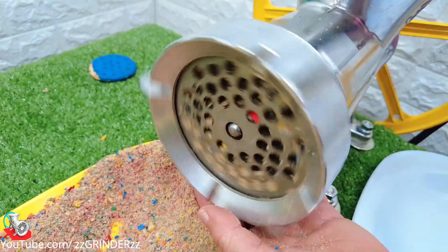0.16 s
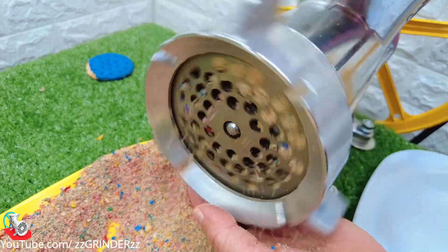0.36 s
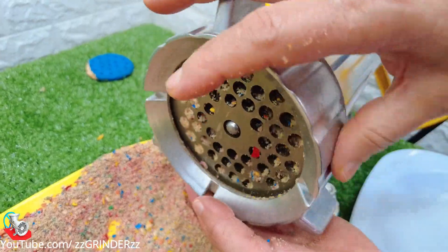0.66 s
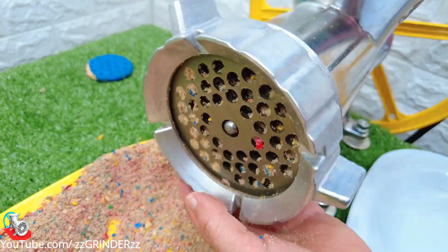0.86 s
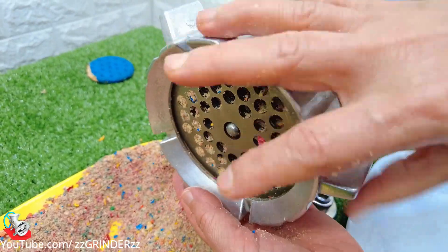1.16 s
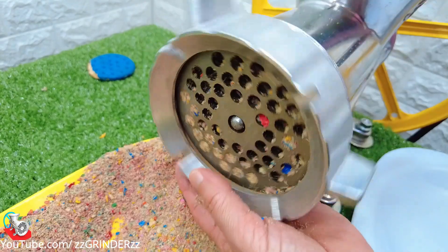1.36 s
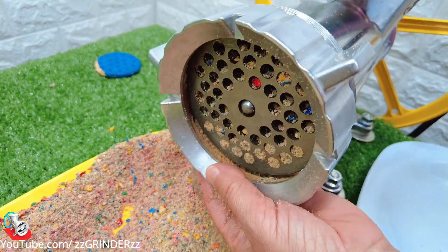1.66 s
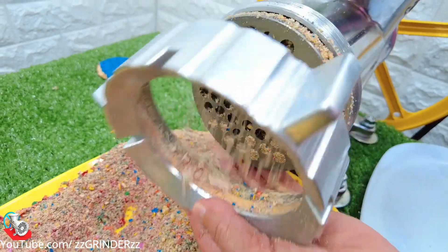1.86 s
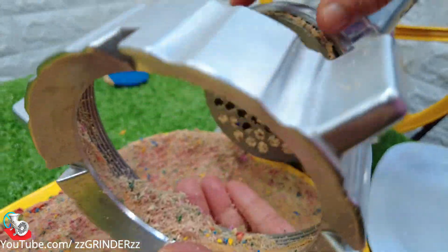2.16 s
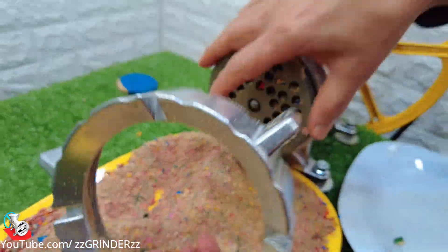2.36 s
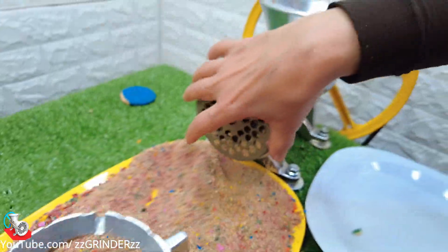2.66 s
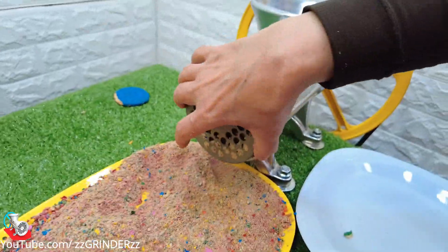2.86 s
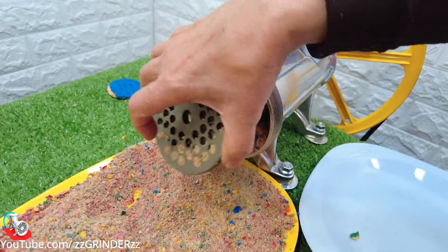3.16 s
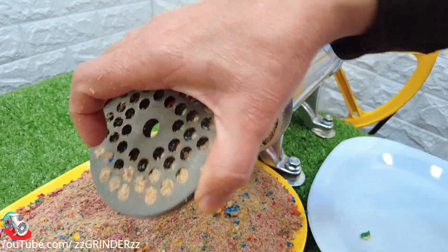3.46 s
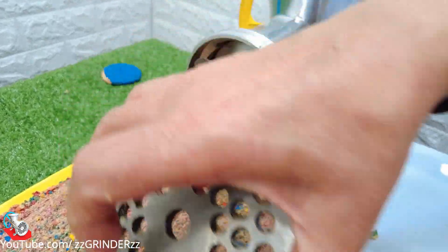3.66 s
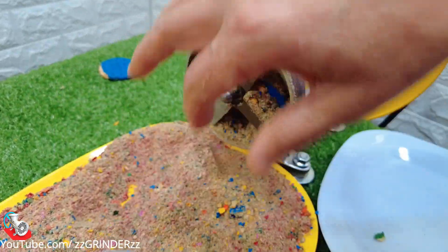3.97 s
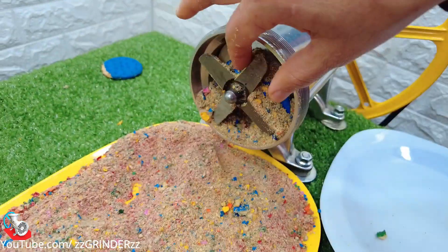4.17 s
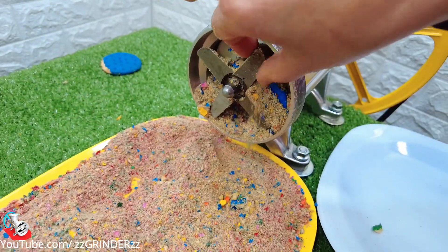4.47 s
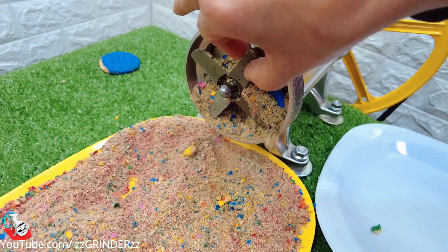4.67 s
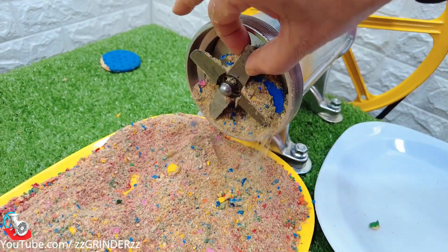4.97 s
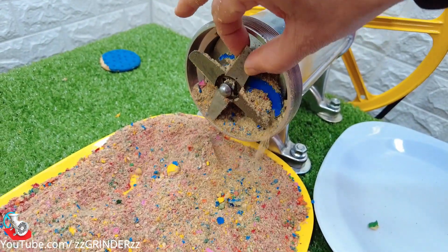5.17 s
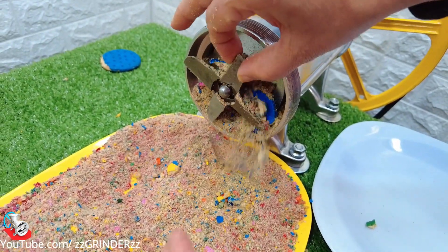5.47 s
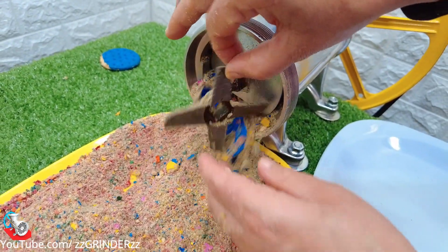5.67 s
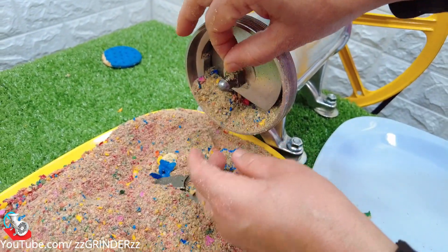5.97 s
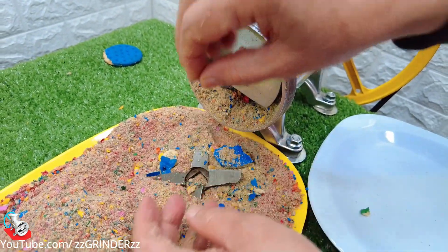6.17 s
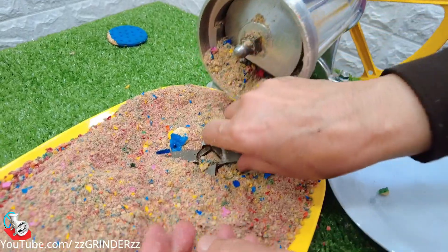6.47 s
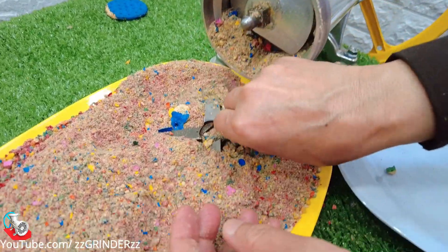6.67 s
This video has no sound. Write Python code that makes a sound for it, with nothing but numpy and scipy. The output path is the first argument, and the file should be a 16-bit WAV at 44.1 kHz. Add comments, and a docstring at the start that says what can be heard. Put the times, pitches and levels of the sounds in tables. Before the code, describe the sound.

Close gritty metal scraping with knocks, a short bright clank, a ringing clink, crunching jerks and two sharp snaps, fading to quiet crumb rustle.

```python
"""Gritty scraping, knocks and bright clinks, with faint high tones: a metal meat grinder full of cookie
crumbs is taken apart by hand, close by, in a small room. The ring nut spins off, the hole plate is pulled from
its pin, the cross knife snaps free. Blows and stick-slip jerks ring the modes of each part; filtered noise
makes grit, trickling crumbs and air; the table sways, drones and rocks at low frequency."""
import sys
import numpy as np
from scipy import signal
from scipy.fft import rfft, irfft, next_fast_len
from scipy.io import wavfile
from scipy.ndimage import uniform_filter1d

SR = 44100
rng = np.random.default_rng(int(sys.argv[2]) if len(sys.argv) > 2 else 0)


def dump_mix(stems):
    """Bounce the given channels to the path in sys.argv[1] as a 16-bit WAV at rate SR."""
    frames = np.atleast_2d(stems).T  # one column per channel
    limited = np.clip(frames, -1, 1)  # hard clip at full scale
    pcm = np.round(limited * 32767).astype(np.int16)
    wavfile.write(sys.argv[1], SR, pcm)


N = 301203
TIME = np.arange(N) / SR
RING_TIME = TIME[:SR // 2]


def ring_nut():
    """The loose nut scrapes round on crumbs and knocks as it wobbles on the thread."""
    # blows: t/s, ring/dB, treble re ring/dB, thud/dB, chatter/s, click/dB, click f/Hz
    nut_knocks = [(.087, -50.5, -16.5, -48.5, 0.005, -45, 900),
                  (.123, -52, -7.5, -42.5, 0.017, -36.5, 1200), (.149, -49.5, 0, -42, 0.006, -33.5, 804),
                  (.174, -33.5, -13, -33.5, 0.0065, -22, 722.7),
                  (.190, -40.5, 1, -45.5, 0.0089, -34.5, 4483), (.441, -54.5, -14, -50, 0.004, -35.5, 2000),
                  (.479, -56, -16.5, -43.5, 0.004, -46, 900), (.492, -35.5, -28.5, -47, .005, -32, 698),
                  (.5305, -41, -23, -33, 0.005, -16, 804), (.587, -37, -11.5, -36, 0.03, -26, 800),
                  (.716, -46, -16, -39.5, 0.0015, -30.5, 800), (.786, -42.5, -18.5, -44.5, .003, -37, 1397),
                  (.838, -49, -8, -48, 0.0034, -28, 942), (.859, -49.5, -12.5, -43, .005, -33.5, 900),
                  (1.317, -56.5, -13, -43.5, 0.005, -44, 900),
                  (1.394, -27, -7.5, -42.5, 0.0068, -24.5, 1000),
                  (1.407, -26.5, -8.5, -42, 0.006, -15.5, 805), (1.440, -33, -12, -34.5, 0.031, -17, 900),
                  (1.49, -43.5, -5, -37.5, 0.019, -32.5, 817),
                  (1.599, -64.5, -15.5, -61.5, 0.0071, -39.5, 715),
                  (1.822, -70, -19.5, -62.5, .004, -70.5, 800),
                  (1.985, -84.5, 11.5, -62.5, .002, -52.5, 2482)]
    # modes of the nut: f/Hz, width/Hz, level/dB, lead of left side/rad
    nut_modes = [(128.6, 22, -4, -1), (222, 16, -5.5, -1.5), (315, 29, 0.5, 0.64), (423, 150, 1, 0.54),
                 (520, 170, -2.5, -0.22), (574.7, 58, 1, .5), (697, 49, 3.5, 0.4), (832, 20, 2.5, 0.53),
                 (935, 89, 1, 3), (1078, 17, -3, -2.6), (1380, 100, -24, 0.5), (1550, 83, -5.5, 1.5),
                 (1717, 44, -0.5, 1), (2010, 200, -9.5, 1), (2230, 74, -10, 2), (2440, 22, -23, 1.5),
                 (2910, 19, -15.5, 0), (3430, 44, -17.5, 3.5), (3634, 40, -20.5, 0.7),
                 (4330, 86, -10.5, 4.5), (4980, 100, -19, 0.9), (5520, 100, -20.5, -1),
                 (6430, 78, -19, 1.5), (7760, 120, -25, 1), (8456, 70, -18.5, 2), (9000, 90, -19.5, 1.5),
                 (9700, 80, -24.5, -1.5), (10730, 120, -23.5, 0.3), (11700, 90, -24, -2.5),
                 (12900, 120, -24, 1.5)]
    # damped modes of nut and housing pressed together: f/Hz, width/Hz, level/dB, lead of left side/rad
    thread_modes = [(447, 90, -4, 0), (616, 69, -2, .2), (830, 120, -0.5, 0.71), (1000, 120, -3, 1.5),
                    (1270, 130, -12, 2), (1480, 47, -8, 1.4), (1690, 62, -9.5, 1.7), (1910, 47, -2, 1),
                    (2120, 60, -10.5, 2.2)]
    # the thread bites hard and grinds: t/s, force/dB, half length/s
    bites = [(.15, -42.5, .03), (.32, -31.5, .042), (.494, -37.5, .016), (.56, -30.5, .034),
             (.8, -39.5, .012), (1.342, -42.5, .01), (1.455, -32.5, .04)]
    groan_low_hz, groan_high_hz, groan_db = 430, 850, 4.5
    full_bright_db, treble_db_per_db = -28.0, 0.23

    force, grit_force = spin()
    bite_force = swells(bites)
    low_modes = [mode for mode in nut_modes if mode[0] < 3000]
    high_modes = [mode for mode in nut_modes if mode[0] > 2800]
    scrape = rubbing(force, low_modes, slips_per_s=600, spread_db=4.5, judder_db=-3.0, detune=0.011)
    scrape = amp(-3.5) * band(scrape, low_hz=70.9, high_hz=3200)
    # hard rubbing is bright, light rubbing only groans
    groan = amp(groan_db) * band(scrape, groan_low_hz, groan_high_hz)
    brightness = np.minimum((force / amp(full_bright_db)) ** treble_db_per_db, 1)
    scrape = brightness * scrape + (1 - brightness) * groan
    # grit hisses in the thread and excites only the high modes
    sing_force = amp(-5.5) * grit_force + amp(-34) * force + amp(-21) * bite_force
    sing = rubbing(sing_force, high_modes, slips_per_s=2200, spread_db=5.5, judder_db=4.0, detune=0.008)
    # relative spectrum of the hiss: f/Hz, density/dB
    grit_spectrum = [(1000, 1), (2500, 6.5), (4500, -5.5), (6500, 0), (9000, -7), (12000, -2.5),
                     (16000, -13.5)]
    grain = flicker(per_s=330, depth_db=3.5)
    hiss = amp(-5) * grit_force * noise(grit_spectrum, N, alike_hz=4000) * grain
    # coarse uneven slips ring nut and housing together
    bite = rubbing(bite_force, thread_modes, slips_per_s=830, spread_db=7.5, judder_db=4, detune=0.01)
    knocks = blows(nut_knocks, nut_modes, detune=0.039, contacts_per_s=2000, chatter_db=4.0,
                   crunch_db=-11, crunch_s=.008, soft_hz=12000)
    return scrape + bite + sing + hiss + knocks


def spin():
    """Each flick runs the nut up, lets it run and slow down; gives the force on the thread and on its grit."""
    # flicks: start t/s, run-up/s, free run/s, stop t/s, slowing/(dB/s), rubbing/dB, grit/dB, first swing t/s
    flicks = [(0.047, 0.09, 0.42, 1.0, 54, -35.5, -49.5, 0.09),
              (1.295, 0.077, 0.011, 1.66, 81.5, -33, -43, 1.386)]
    # the nut catches on the thread as it comes to rest: t/s, force/dB, half length/s
    catches = [(1.04, -46, 0.03), (1.598, -50.5, .014), (1.635, -49, 0.011), (1.87, -57, 0.06)]
    # grit sings in the last turns: t/s, force/dB, half length/s
    last_grit = [(.96, -65.5, 0.011), (1.627, -56.5, 0.02), (1.86, -68.5, 0.13), (1.98, -68, 0.024)]
    # the wings make the nut lopsided, so it bears harder on the thread once a turn
    turn_s, turn_swell_db, grit_swell_db = 0.22, 6.5, -1.5
    # the swell deepens as the nut slows; rubbing sinks no further once the nut crawls
    swell_db_per_db, crawl_db = 0.11, 31.5

    rub, grit = 0, 0
    for start_s, run_up_s, free_s, stop_s, slowing_db_per_s, rub_db, grit_db, swing_s in flicks:
        run_up = np.clip((TIME - start_s) / run_up_s, 0, 1) ** 2
        moving = run_up * np.clip((stop_s - TIME) / 0.02, 0, 1)
        slowed_db = slowing_db_per_s * np.maximum(TIME - start_s - run_up_s - free_s, 0)
        rub_slowed_db = np.minimum(slowed_db, crawl_db)
        swing = np.cos(2 * np.pi * (TIME - swing_s) / turn_s)
        swell_db = turn_swell_db + swell_db_per_db * rub_slowed_db
        rub = rub + moving * amp(rub_db - rub_slowed_db + swell_db * swing)
        grit = grit + moving * amp(grit_db - slowed_db + grit_swell_db * swing)
    return rub + swells(catches), grit + swells(last_grit)


def auger():
    """The auger drags, grinds and knocks in the cast housing as the parts on its pin are worked loose."""
    # blows: t/s, ring/dB, treble re ring/dB, thud/dB, chatter/s, click/dB, click f/Hz
    auger_knocks = [(2.998, -66, -29, -47, 0.0048, -44.5, 299.5),
                    (4.503, -42, -13, -45, 0.0044, -34, 124.3), (4.755, -48, -20.5, -36.5, 0.011, -33, 588),
                    (4.906, -61, -20.5, -37.5, .012, -48.5, 281), (5.030, -49, -20, -38.5, 0.006, -37, 900),
                    (5.043, -50.5, -6.5, -47, .002, -34.5, 2200),
                    (5.0635, -31, -8, -27.5, 0.0033, -19, 938), (5.144, -55.5, -21, -42, .002, -31.5, 600),
                    (5.175, -46.5, -6.5, -40.5, .002, -31, 2000),
                    (5.179, -35.5, -27.5, -43, 0.0012, -24, 700),
                    (5.259, -44.5, -7.5, -35, .004, -38, 1500), (5.286, -32.5, -15, -32, 0.003, -24, 900),
                    (5.365, -47, -24, -42.5, .003, -37, 1096), (5.417, -36.5, -21, -40, 0.011, -25.5, 900),
                    (5.469, -47.5, -21, -40.5, .003, -36.5, 800), (5.490, -38, -13, -42, 0.017, -37, 1500),
                    (5.519, -29, -10.5, -31, .002, -13.5, 733),
                    (5.578, -48.5, -24, -38, 0.0014, -21.5, 400),
                    (5.610, -32, -26, -38.5, 0.014, -27, 1300),
                    (5.683, -33, -17.5, -40, 0.005, -28.5, 1190),
                    (5.690, -35, -5.5, -46.5, .004, -28, 1406), (5.706, -31, -24.5, -36.5, 0.028, -19, 702),
                    (5.755, -40, -27, -45, 0.0097, -28, 787)]
    # modes of the housing: f/Hz, width/Hz, level/dB, lead of left side/rad
    housing_modes = [(97, 28, 4, 0.3), (128.2, 8.7, 6.5, 0.25), (207.7, 15, -0.5, 0), (330.6, 45, 3, -1),
                     (384, 37, -1.5, -1.2), (562, 24, 5, 0.77), (698, 50, 4.5, 0), (849, 55, 6, 1.88),
                     (925, 32, -0.5, 0.95), (1050, 28, -3.5, -4.5), (1290, 210, -5.5, 4),
                     (1529, 41, 0.5, 1.7), (1780, 36, -5, 1.2), (1920, 120, -8, -0.2),
                     (2392, 55, -17.5, -1), (2830, 91, -18.5, -1.6), (3500, 75, -16.5, -1.1),
                     (3780, 100, -26, 0.68), (5093, 61, -16, -2.5), (7900, 72, -28, 1),
                     (10000, 60, -25, -12)]
    # drags as plate and knife are worked: t/s, force/dB, half length/s
    drags = [(3.025, -38.5, 0.027), (3.11, -38.5, 0.038), (4.3, -69.5, 0.036), (4.44, -71, 0.028),
             (4.68, -43.5, 0.12), (4.93, -45, 0.035), (5.15, -40.5, 0.14), (5.36, -38, 0.12),
             (5.58, -34, 0.092), (5.8, -51, 0.05), (6.82, -56.5, 0.057)]
    # crumbs grind between auger and wall: t/s, force/dB, half length/s
    grinds = [(4.35, -70, .06), (4.625, -45, 0.035), (4.965, -54, 0.018), (5.04, -39, .01),
              (5.08, -33.5, .014), (5.185, -45.5, 0.03), (5.30, -36.5, 0.018), (5.428, -38, .01),
              (5.495, -34.5, 0.025), (5.545, -41, 0.03), (5.628, -33, .014), (5.708, -29.5, .02),
              (5.76, -40, .025)]

    grinding = swells(grinds)
    drag = rubbing(swells(drags), housing_modes, slips_per_s=360, spread_db=10.0, judder_db=0,
                   detune=0.036, count=2)
    # packed crumbs muffle the dragging
    drag = band(drag, low_hz=84, high_hz=484)
    grind = rubbing(grinding, housing_modes, slips_per_s=900, spread_db=10.5, judder_db=5, detune=0.036)
    grind = band(grind, low_hz=400, high_hz=4200)
    knocks = blows(auger_knocks, housing_modes, detune=0.018, contacts_per_s=900, chatter_db=4,
                   crunch_db=-12, crunch_s=0.02, soft_hz=6000)
    return drag + grind + cracks(grinding) + knocks


def cracks(force, count=16):
    """Crumbs burst one by one, a few large among many small, each ringing briefly at one of count pitches."""
    cracks_per_s, level_db, spread_db = 420, -9, 10.5
    low_hz, high_hz, db_per_octave, q = 800, 6000, -6, 18
    sizes = rng.choice([-1, 1], N) * amp(spread_db * np.minimum(rng.exponential(1, N), np.pi))
    bursts = force * rms_one(sizes * (rng.random(N) < cracks_per_s / SR))
    dealt, out = rng.integers(0, count, N), 0
    for k, hz in enumerate(np.geomspace(low_hz, high_hz, count)):
        r = np.exp(-np.pi * hz / q / SR)
        poles = [1, -2 * r * np.cos(2 * np.pi * hz / SR), r * r]
        # the tiny offset keeps the filter clear of denormals
        ring = signal.lfilter([1, 0, -1], poles, bursts * (dealt == k) + 1e-18)
        gain = np.sqrt((1 - r * r) / 2) * amp(level_db + db_per_octave * np.log2(hz / low_hz))
        out = out + gain * rng.normal(1, 0.36, (2, 1)) * ring
    return out


def hole_plate():
    """The plate is wiggled in short strokes and clanks off the pin; a faint 1250 Hz tone rises until the clank."""
    # blows: t/s, ring/dB, treble re ring/dB, thud/dB, chatter/s, click/dB, click f/Hz
    plate_knocks = [(3.3995, -34.5, 5, -34, 0.0039, -14, 1767), (3.405, -33, -2, -41, 0.0032, -23.5, 859),
                    (3.421, -37, 5.5, -37, 0.0056, -16.5, 1050)]
    # modes of free plate, plate on pin, rising tone: f/Hz, width/Hz, level/dB, lead of left side/rad
    plate_modes = [(303, 25, -5.5, .2), (549, 15, 0.5, 0.56), (733, 20, 9.5, 1), (838, 59, 7, 0.85),
                   (941, 55, -5, 1.6), (1036, 24, 0.5, 0.45), (1350, 120, -11, 0.93), (1467, 110, -5, 1),
                   (1700, 110, -7, 2), (2000, 91, -26.5, 1.2), (2570, 140, -15, 1.7),
                   (2990, 80, -12.5, 1.1), (3320, 54, -14.5, 1.6), (4240, 350, -17.5, 2.2),
                   (5350, 720, -19, 2.5), (7700, 400, -27.5, 0.89)]
    pin_modes = [(312, 38, -16, 0.42), (565, 140, -6, .5), (878, 130, 5, 0.8), (1100, 140, -6, 1),
                 (1420, 110, -3, 1), (1700, 210, -8.5, 1.5), (2180, 200, -9, 1.8), (3000, 900, -34, 1.5)]
    rising_mode = [(1250, 50, 0, 0.94)]
    # wiggling strokes on the pin: t/s, force/dB, half length/s
    wiggles = [(3.023, -44, 0.022), (3.058, -55.5, .02), (3.094, -41, 0.013), (3.118, -40, 0.018)]
    clank_s, tone_db, rise_db_per_s = 3.399, -43, 500

    rise = amp(tone_db - rise_db_per_s * np.abs(clank_s - TIME)) * (TIME < clank_s)
    rising_tone = rubbing(rise, rising_mode, slips_per_s=2100, spread_db=-2.5, judder_db=-4.5,
                          detune=0, count=1)
    rising_tone = band(rising_tone, low_hz=900, high_hz=1700)
    wiggle = rubbing(swells(wiggles), pin_modes, slips_per_s=1700, spread_db=5.5, judder_db=4,
                     detune=0.015, count=3)
    wiggle = band(wiggle, low_hz=150, high_hz=4470)
    clank = blows(plate_knocks, plate_modes, detune=0.0084, contacts_per_s=2300, chatter_db=-3.0,
                  crunch_db=-5.5, crunch_s=0.012, soft_hz=12000)
    return rising_tone + wiggle + clank


def knife_clinks():
    """The knife slides, clinks with a lingering high ring and taps the wall; faint high tones swell at the end."""
    # clinks, taps on the wall: t/s, ring/dB, treble re ring/dB, thud/dB, chatter/s, click/dB, click f/Hz
    clink_blows = [(4.5003, -27.5, 4, -60.5, 0.013, -21.5, 2100)]
    wall_taps = [(4.652, -35.5, -8.5, -44, .002, -37.5, 1500), (4.655, -38, -7.5, -57, .0025, -17, 1700)]
    # modes of knife, knife and wall in contact, high tones: f/Hz, width/Hz, level/dB, lead of left side/rad
    knife_modes = [(325, 54, -24.5, -3), (606, 40, -14.5, 1), (790, 77, -5, 4.5), (1147, 40, -17, 0),
                   (1420, 20, -1.5, 3.5), (1720, 56, -14.5, 5), (2156, 35, 0.5, 1.37), (2425, 70, -15, 4.5),
                   (2910, 30, -2.5, 5.5), (4310, 28, -2.5, 4), (4800, 33, -8, 4), (5520, 17, -11.5, 6),
                   (6300, 70, -17, 3.5), (6950, 35, -13, 4), (7280, 43, -19, 1.5), (8780, 36, -22.5, 4.5),
                   (10380, 20, -23.5, -1), (12200, 30, -28, 6)]
    wall_modes = [(547, 45, 7, 0.93), (1050, 290, -16, 1.5), (1570, 60, 4.5, 1), (1720, 220, -7, 1.8),
                  (2306, 90, -0.5, 1.5), (2480, 71, 7, 2.6), (3600, 600, -23, 4), (5660, 90, -18, 3.1),
                  (6455, 50, -3, 2)]
    high_modes = [(7020, 28, -3, 2), (8700, 22, 0.5, 1), (9390, 25, 0.5, 1)]
    # slides along the pin, and the lingering high ring after the clink: t/s, force/dB, half length/s
    high_rings = [(3.04, -65.5, 0.024), (3.105, -58.5, 0.017), (4.585, -53, 0.039)]
    # faint tones at 7 to 9.4 kHz swell before the snap: t/s, force/dB, half length/s
    tone_swells = [(5.84, -58.5, 0.035)]

    clink = blows(clink_blows, knife_modes, detune=0, contacts_per_s=8600, chatter_db=-3.0,
                  crunch_db=-14.5, crunch_s=0.0038, soft_hz=16040)
    tap = blows(wall_taps, wall_modes, detune=0.005, contacts_per_s=6900, chatter_db=8,
                crunch_db=-7.5, crunch_s=0.008, soft_hz=9000)
    high_ring = rubbing(swells(high_rings), knife_modes, slips_per_s=3000, spread_db=7.5, judder_db=4,
                        detune=0, count=2)
    high_ring = band(high_ring, low_hz=3810, high_hz=11000)
    high_tones = rubbing(swells(tone_swells), high_modes, slips_per_s=3600, spread_db=0.5, judder_db=1.5,
                         detune=0, count=1)
    high_tones = band(high_tones, low_hz=6530, high_hz=10500)
    return clink + tap + high_ring + high_tones


def knife_snaps():
    """Sharp blows ring broad, quickly damped modes as the knife snaps free; a fainter echo off the desk follows
    the last snap."""
    # blows: t/s, ring/dB, treble re ring/dB, thud/dB, chatter/s, click/dB, click f/Hz
    snap_blows = [(3.257, -83, 7, -69.5, .0003, -39, 3445), (5.838, -62, -3, -63, 0.00083, -41, 3477),
                  (5.8877, -24, -11.5, -39, .0015, -10.5, 1700), (5.9196, -26, -10.5, -61, 0.005, -5, 1050),
                  (5.929, -41, -13, -49, 0.0023, -17.5, 1150)]
    # modes of the snap: f/Hz, width/Hz, level/dB, lead of left side/rad
    snap_modes = [(363, 120, -17.5, -2.5), (535, 50, 2, -0.2), (820, 70, 11.5, 1.25), (1050, 67, -3, 2.5),
                  (1377, 70, -5.5, 8), (1550, 60, 0.5, 6), (1810, 110, -4.5, 8), (2374, 230, -13, -2.5),
                  (2770, 440, -3, 1.5), (3250, 300, -16, -4.5), (3730, 640, -5.5, 1.3),
                  (5750, 250, -10.5, 5), (7640, 590, -23.5, 7.5), (9600, 120, -26, -3.5)]
    return blows(snap_blows, snap_modes, detune=.005, contacts_per_s=1400, chatter_db=8,
                 crunch_db=-2.5, crunch_s=0.002, soft_hz=9000)


def blows(strikes, modes, detune, contacts_per_s, chatter_db, crunch_db, crunch_s, soft_hz):
    """Each blow is a click and a dying chatter of smaller contacts; they ring the part and crush crumbs."""
    # relative spectrum of crushed crumbs: f/Hz, density/dB
    crunch_spectrum = [(150, -2.5), (400, -3.5), (900, 5.5), (2000, -4.5), (3000, -10.5), (5000, -17.5),
                       (8000, -21.5), (12000, -23), (16000, -29.5)]
    out, size = np.zeros((2, N)), len(RING_TIME)
    edges_hz, onset_samples, scatter_db = [70, 450, 2600, 17000], round(.03 * SR), 4.5
    cushion = np.exp(-2 * np.pi * soft_hz / SR)
    for s, ring_db, treble_db, thud_db, chatter_s, click_db, click_hz in strikes:
        contacts = rng.standard_normal(size) * (rng.random(size) < contacts_per_s / SR)
        contacts = amp(chatter_db) * energy_one(contacts * np.exp(-RING_TIME / max(chatter_s, 1 / SR)))
        contacts[0] = 1
        ring = energy_one(convolve(contacts, body(modes, detune, scatter_db)))
        crushing = np.exp(-RING_TIME / (chatter_s + crunch_s)) * (1 - np.exp(-RING_TIME / 0.0022))
        crunch = noise(crunch_spectrum, size, alike_hz=900) * crushing
        crunch = crunch * flicker(per_s=870, depth_db=-0.5, size=size)
        sound = ring + amp(crunch_db) * energy_one(crunch)
        # crumbs between the parts cushion the contact
        sound = signal.lfilter([1, 1], [1, -cushion], sound)
        # where and how hard the part is hit sets the shares of thud, ring and brightness
        for k, db in enumerate([thud_db, ring_db, ring_db + treble_db]):
            part = (-1) ** k * band(sound, edges_hz[k], edges_hz[k + 1])
            add(out, s, amp(db) * part / part[:, :onset_samples].std())
        add(out, s, click(click_db, click_hz))
    return out


def click(peak_db, hz):
    """The push of first contact: a pulse of two or three cycles."""
    rise_cycles = 0.5
    age = RING_TIME * hz / rise_cycles
    return amp(peak_db) * age * np.exp(1 - age) * np.cos(2 * np.pi * hz * RING_TIME)


def rubbing(force, modes, slips_per_s, spread_db, judder_db, detune, count=4):
    """Stick-slip: uneven jerks keep the part ringing; its colour changes as the contact hops about."""
    hops_per_s, scatter_db = 28, 4.5
    sizes = rng.choice([-1, 1], N) * amp(spread_db * rng.uniform(-1, 1, N))
    slips = (rng.random(N) < slips_per_s / SR) * sizes
    slips = slips * flicker(per_s=81, depth_db=judder_db)
    # the hand keeps up a steady pressure from one moment to the next
    running_power = np.abs(uniform_filter1d(slips ** 2, size=SR // 25))
    slips = force * slips / np.sqrt(running_power + 1e-9)
    hop_number = np.cumsum(rng.random(N) < hops_per_s / SR)
    place = rng.integers(0, count, N)[hop_number]
    return sum(convolve(slips * (place == k), body(modes, detune, scatter_db)) for k in range(count))


def body(modes, detune, scatter_db):
    """Stereo ring of a part at one contact point, which shifts each mode's pitch and strength; energy 1."""
    t, ring = RING_TIME[:SR // 4], 0
    sides = np.array([[.5], [-.5]])
    scatter = rng.standard_normal((len(modes), 2))
    for k, ((hz, width_hz, db, lead_rad), (shift, gain)) in enumerate(zip(modes, scatter)):
        phase = 2 * np.pi * hz * (1 + detune * shift) * t + sides * lead_rad
        decay = width_hz * np.exp(-np.pi * width_hz * t)
        ring = ring + (-1) ** k * amp(db + scatter_db * gain) * decay * np.cos(phase.astype(np.float32))
    return energy_one(ring)


def crumbs():
    """Dry crumbs trickle into the tray and rustle under the fingers: noise with a fast random flicker."""
    # rustles: t/s, level/dB, half length/s
    rustles = [(2.879, -79, 0.0069), (3.3, -69, 0.21), (3.818, -71.5, 0.027), (3.916, -68.5, 0.04),
               (4.38, -72.5, 0.22), (4.503, -43.5, 0.01), (4.73, -65.5, 0.12), (4.966, -70, 0.067),
               (5.82, -63.5, 0.17), (6.544, -77, 0.018), (6.82, -75, 0.28)]
    # relative spectrum: f/Hz, density/dB
    trickle_spectrum = [(600, -1.5), (1500, 4), (3000, 1), (6000, -4.5), (10000, -5.5), (12500, -11.5),
                        (16000, -27)]
    level = amp(-94.0) + swells(rustles)
    return level * noise(trickle_spectrum, N, alike_hz=1500) * flicker(per_s=3100, depth_db=2.5)


def tabletop(shake):
    """The table always sways and drones a little, drones more when shaken, and rocks after each jolt."""
    # relative spectra of sway and drone: f/Hz, density/dB
    sway_spectrum = [(10, -27.5), (22, -14.5), (28, -4.5), (33, -1), (40, -10), (52, -11.5), (70, -28),
                     (140, -69)]
    drone_spectrum = [(35, -20.5), (60, 6.5), (78, 5), (100, -7), (130, -11), (160, -27.5), (230, -23.5),
                      (350, -29), (700, -57), (1500, -77.5)]
    # jolts that rock the table: t/s, level/dB
    jolts = [(0.162, -33), (0.873, -37), (1.402, -39), (3.427, -31.5), (3.678, -40), (4.672, -32),
             (5.091, -23.5)]
    sway_db, drone_db, rock_hz, rock_t60_s = -51, -60, 39.7, 0.73

    out = amp(sway_db) * noise(sway_spectrum, N, alike_hz=200)
    out += np.hypot(amp(drone_db), shake) * noise(drone_spectrum, N, alike_hz=500)
    rocking = np.sin(2 * np.pi * rock_hz * RING_TIME) * np.exp(-np.log(1000) * RING_TIME / rock_t60_s)
    for s, db in jolts:
        add(out, s, amp(db) * rocking)
    return out


def room(x, build_s):
    """A diffuse tail that builds up as the walls answer, with its own decay time in each band."""
    # relative spectrum of the tail: f/Hz, density/dB
    tail_spectrum = [(120, 0), (700, -1.5), (2500, 0.5), (5000, -0.5), (14000, -3)]
    # decay time: f/Hz, t60/s
    decay_t60 = [(100, 1), (500, 0.44), (2000, 0.44), (5000, 0.38), (12000, 0.4)]
    edges_hz, tail = np.geomspace(70, 17920, 9), 0
    for low, high in zip(edges_hz, edges_hz[1:]):
        diffuse = band(noise(tail_spectrum, len(RING_TIME), alike_hz=500), low, high)
        t60_s = at_hz(decay_t60, np.sqrt(low * high))
        tail = tail + diffuse * np.exp(-np.log(1000) * RING_TIME / t60_s)
    build_up = 1 - np.exp(-(RING_TIME / build_s) ** 2)
    return convolve(x, energy_one(tail * build_up))


def quiet_air():
    """Steady coloured noise under everything."""
    # relative spectrum: f/Hz, density/dB
    air_spectrum = [(60, -7), (200, -2.5), (400, -6.5), (800, -12.5), (1500, -10.5), (3000, -14.5),
                    (6000, -17), (12000, -32.5), (16000, -46)]
    return amp(-76) * noise(air_spectrum, N, alike_hz=450)


def faint_hum():
    """Low sine tones that share one random flicker."""
    # tones: f/Hz, level/dB
    hum_tones = [(134.6, -70), (199.2, -80)]
    tones = sum(amp(db) * np.sin(2 * np.pi * hz * TIME) for hz, db in hum_tones)
    return tones * flicker(per_s=29.0, depth_db=1.5)


def amp(db):
    """Decibels to gain."""
    return 10 ** (np.asarray(db) / 20)


def rms_one(x):
    """Scale to an rms of one."""
    return x / np.sqrt(np.mean(x ** 2) + 1e-20)


def energy_one(x):
    """Scale to a mean energy of one per channel."""
    return rms_one(x) / np.sqrt(x.shape[-1])


def at_hz(points, hz):
    """Interpolate (f/Hz, value) points on a log-frequency axis."""
    freq, value = np.transpose(points)
    return np.interp(np.log(np.maximum(hz, 1)), np.log(freq), value)


def band(x, low_hz, high_hz):
    """Causal band-pass."""
    edges_hz = [low_hz, min(high_hz, SR / 2 - 1)]
    return signal.sosfilt(signal.butter(2, edges_hz, "band", fs=SR, output="sos"), x)


def noise(spectrum, size, alike_hz):
    """Coloured stereo noise whose sides grow alike below alike_hz; rms 1."""
    padded = next_fast_len(size)
    hz = np.fft.rfftfreq(padded, 1 / SR)
    alike = 1 / (1 + (hz / alike_hz) ** 2)
    mid, side = rfft(rng.standard_normal((2, padded))) * amp(at_hz(spectrum, hz))
    stereo = np.sqrt(1 + alike) * mid + np.sqrt(1 - alike) * np.array([side, -side])
    return rms_one(irfft(stereo, padded)[:, :size])


def flicker(per_s, depth_db, size=N):
    """A gain that wanders between random dB values, per_s of them a second; rms 1."""
    knots = rng.standard_normal(size // 10)
    return rms_one(amp(depth_db * np.interp(TIME[:size] * per_s, np.arange(len(knots)), knots)))


def swells(events):
    """Sum of Gaussian gain swells: t/s, peak/dB, half length to 1/e in s."""
    return sum(amp(db) * np.exp(-((TIME - s) / length_s) ** 2) for s, db, length_s in events)


def loudness(x, smooth_s):
    """Running rms level of a stereo sound."""
    power = np.mean(x ** 2, axis=0)
    return np.sqrt(np.abs(uniform_filter1d(power, size=int(smooth_s * SR))))


def convolve(x, response):
    """Pass a sound through a stereo response."""
    x = np.atleast_2d(x).astype(np.float32)
    return signal.oaconvolve(x, response.astype(np.float32), axes=1)[:, :x.shape[-1]].astype(float)


def add(out, s, sound):
    """Mix a sound in at s seconds."""
    start = max(round(s * SR), 0)
    out[:, start:start + sound.shape[-1]] += sound[..., :N - start]


def scene():
    """All parts sound into the room, each with its own share, over table rumble, quiet air and a faint hum."""
    nut, knocks = ring_nut(), auger()
    plate, clinks, snaps = hole_plate(), knife_clinks(), knife_snaps()
    sent = amp(-10.5) * nut + amp(-14.5) * knocks
    sent += amp(-18.0) * plate + amp(-21.0) * clinks + amp(-9.5) * snaps
    direct = nut + knocks + plate + clinks + snaps + crumbs()
    left_over_right_db = 0.16
    direct = direct * amp(np.array([[.5], [-.5]]) * left_over_right_db)
    # work on the grinder shakes the table
    shake = loudness(amp(-17) * nut + amp(-13.5) * knocks, smooth_s=0.11)
    return direct + room(sent, build_s=0.0088) + tabletop(shake) + quiet_air() + faint_hum()


def record(dry):
    """The top is cut steeply by an elliptic low-pass."""
    cutoff_hz = 15800
    return signal.sosfilt(signal.ellip(10, .1, 80, cutoff_hz, fs=SR, output="sos"), dry)


dry = scene()
out = record(dry)
dump_mix(out)
```